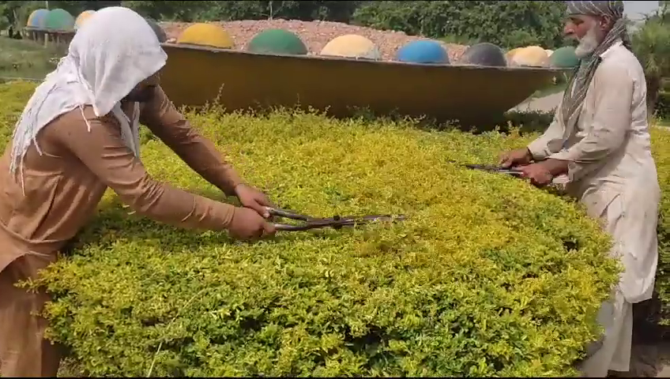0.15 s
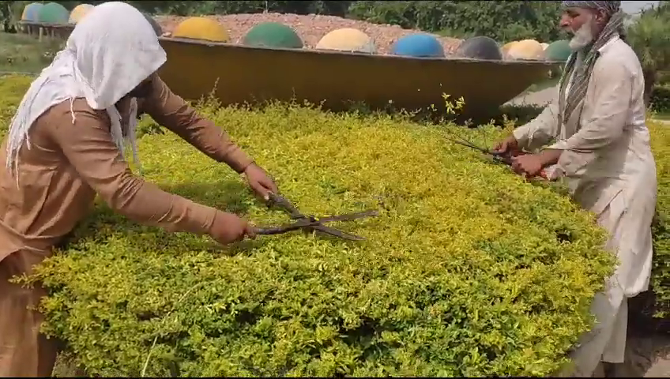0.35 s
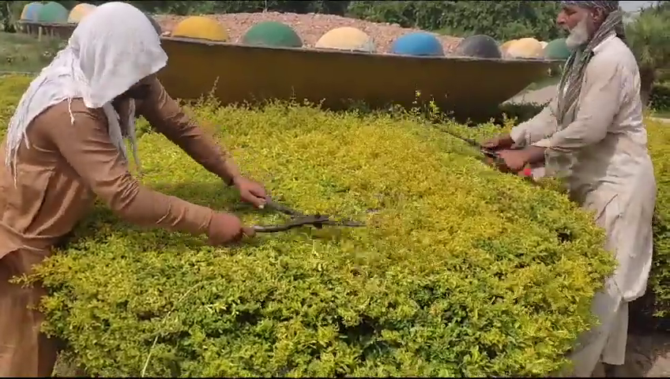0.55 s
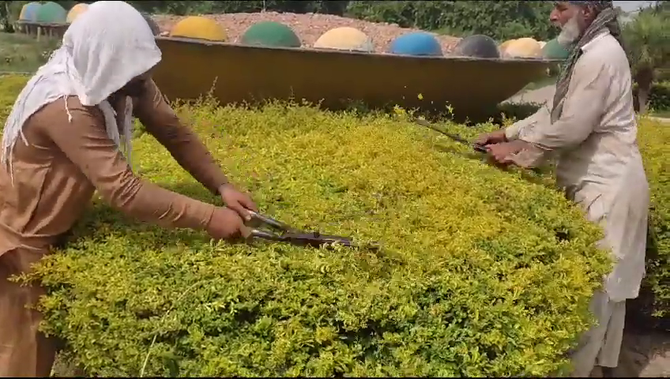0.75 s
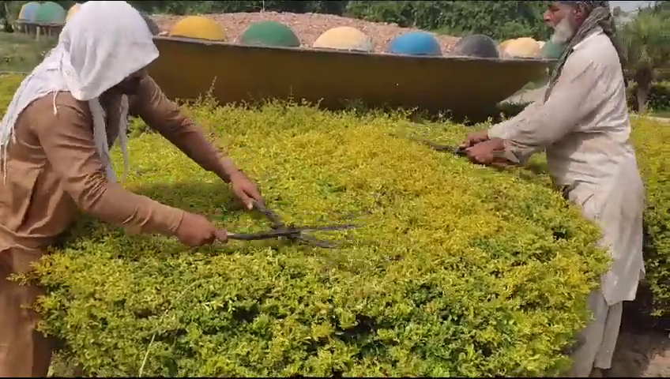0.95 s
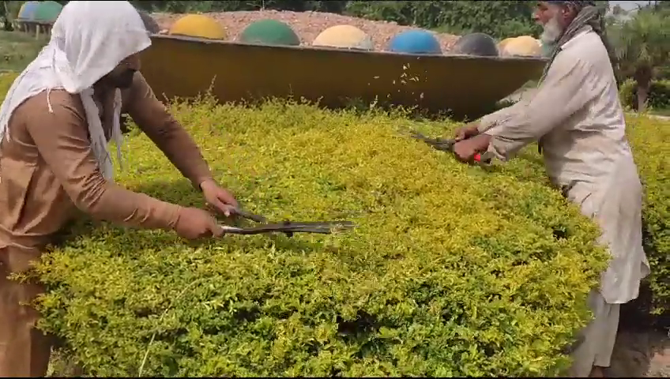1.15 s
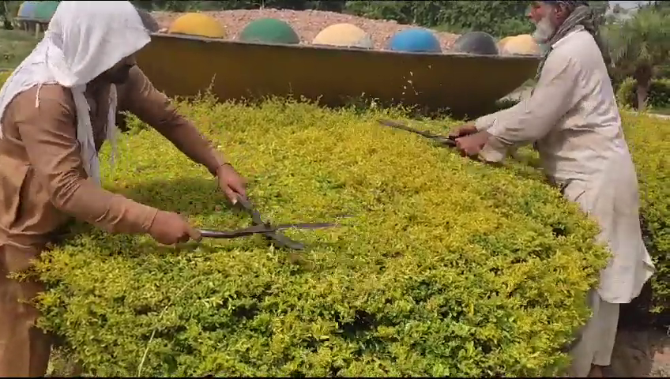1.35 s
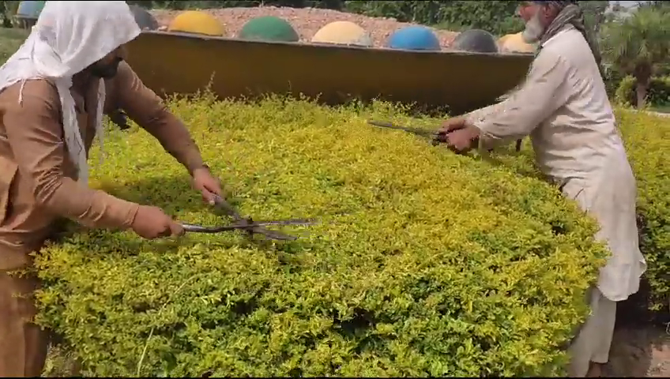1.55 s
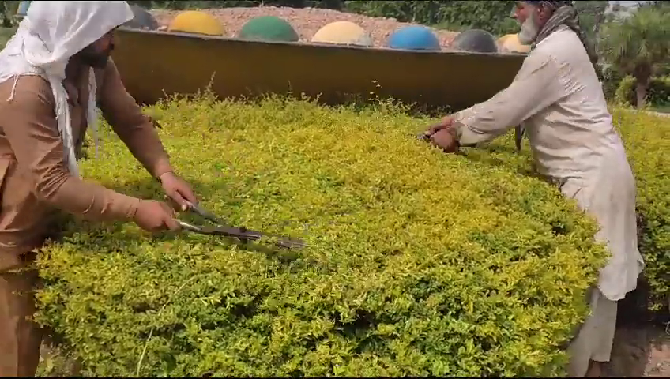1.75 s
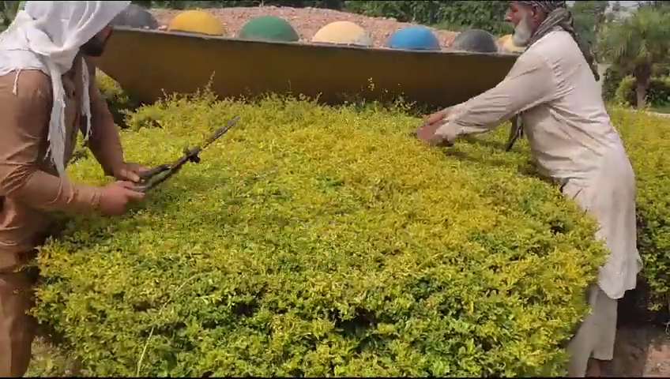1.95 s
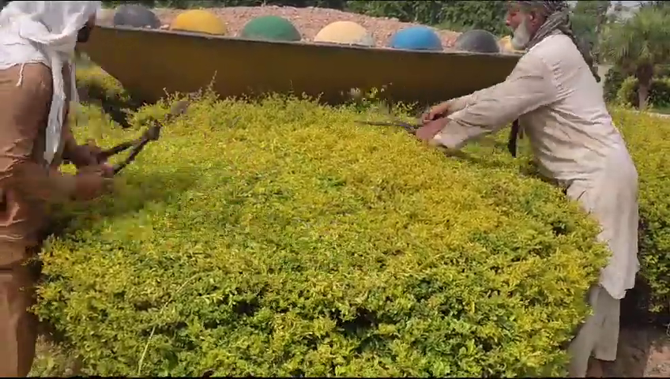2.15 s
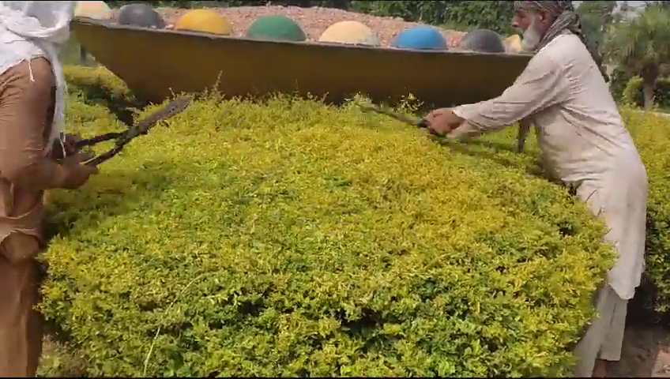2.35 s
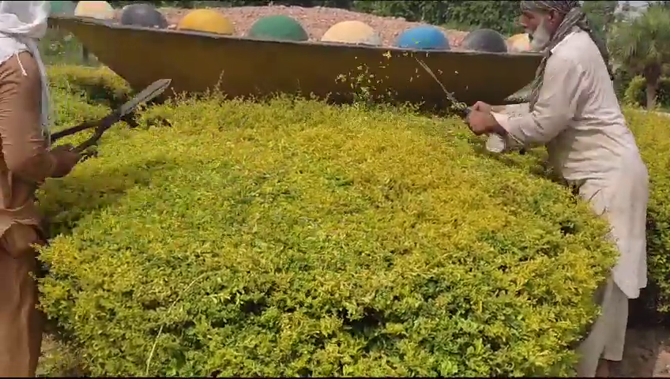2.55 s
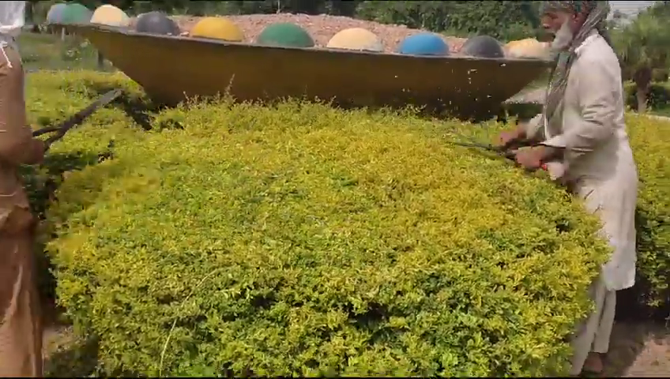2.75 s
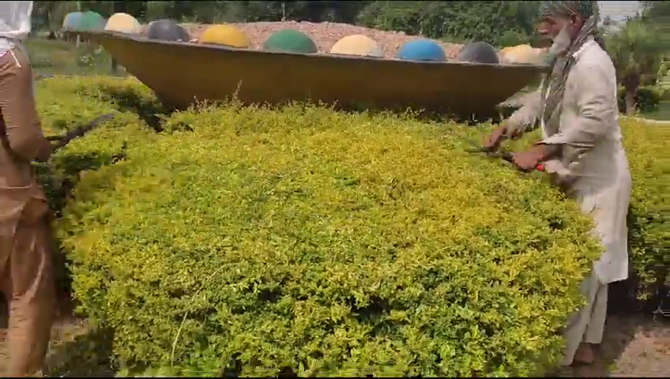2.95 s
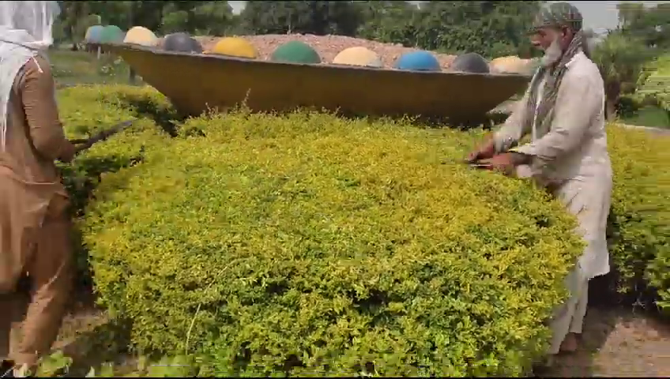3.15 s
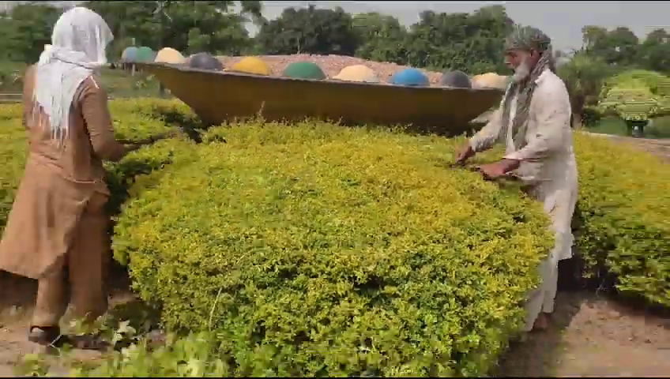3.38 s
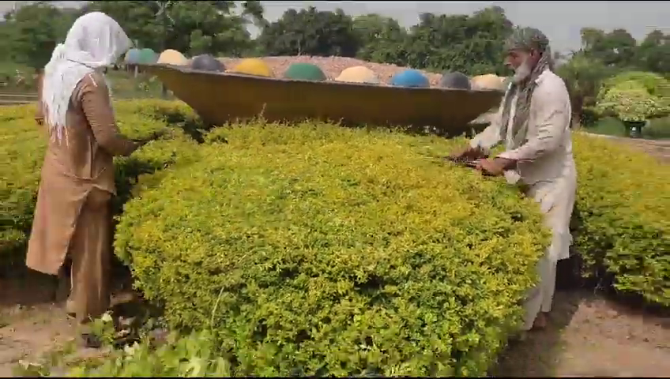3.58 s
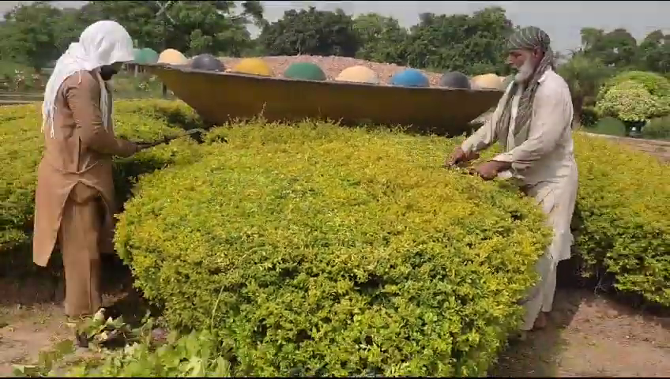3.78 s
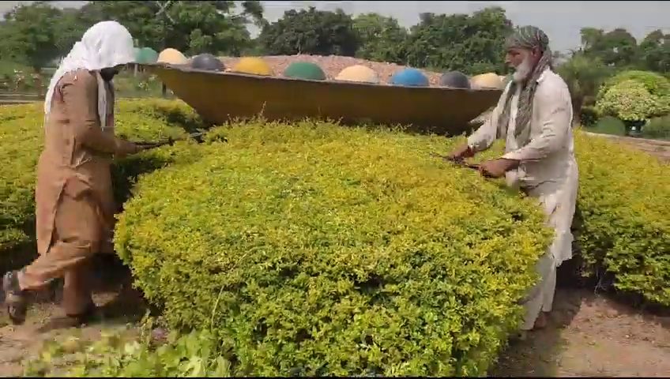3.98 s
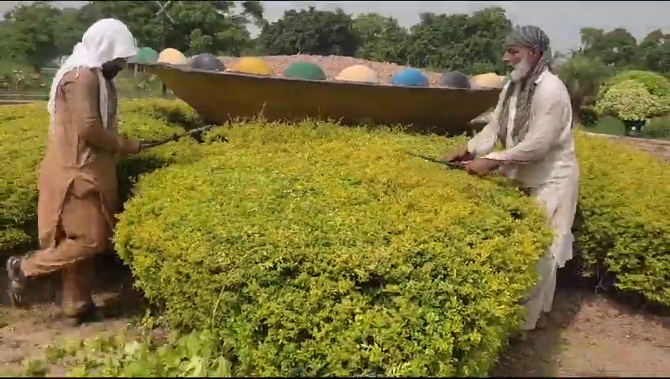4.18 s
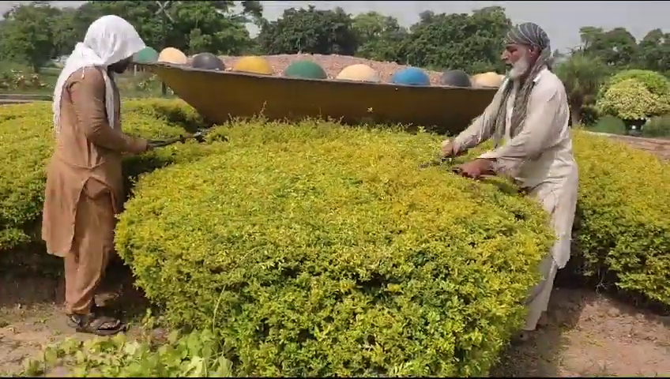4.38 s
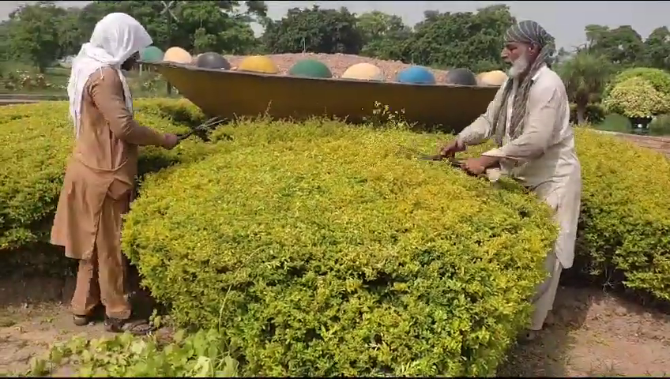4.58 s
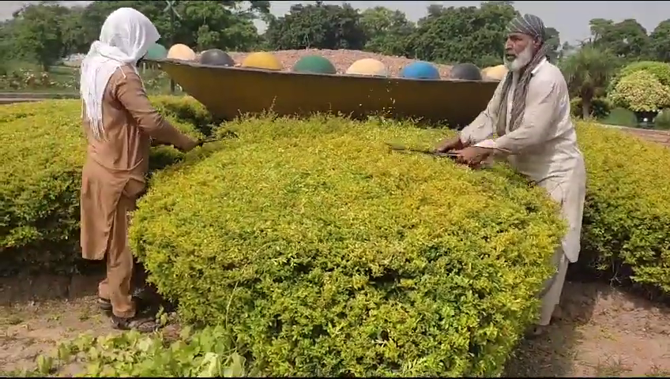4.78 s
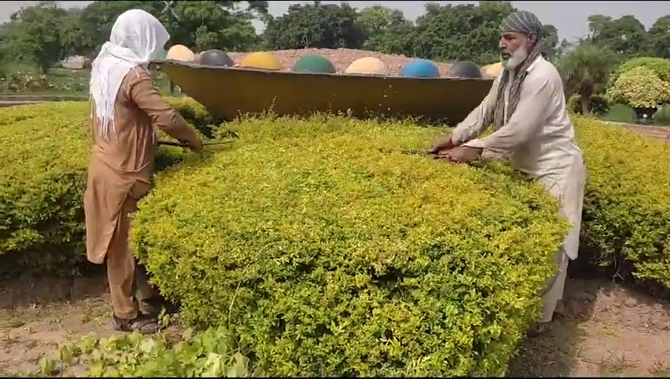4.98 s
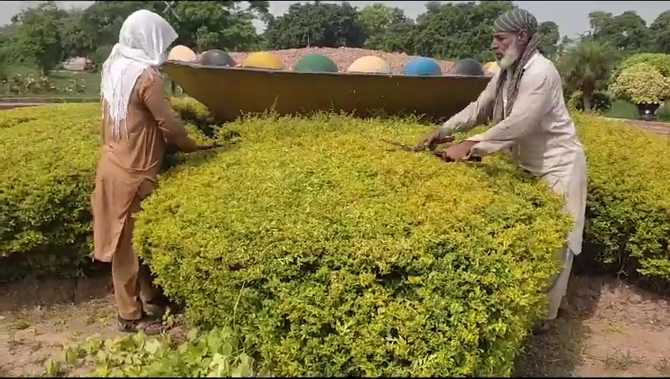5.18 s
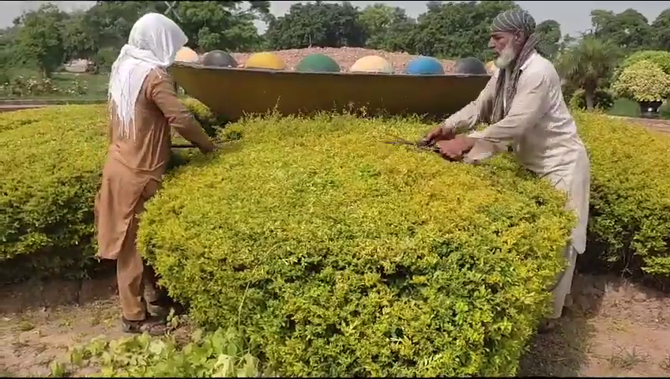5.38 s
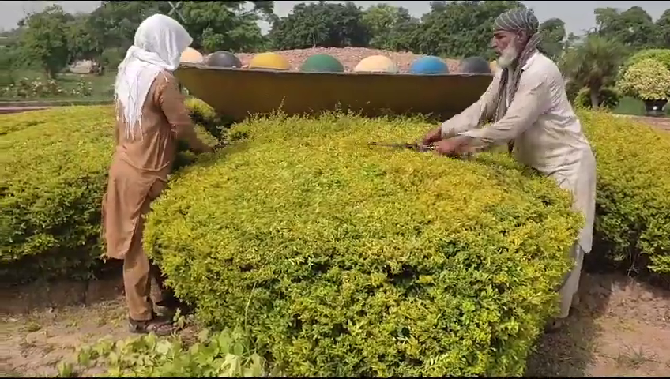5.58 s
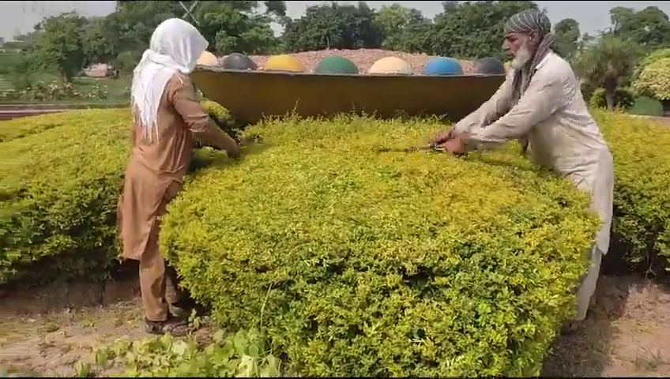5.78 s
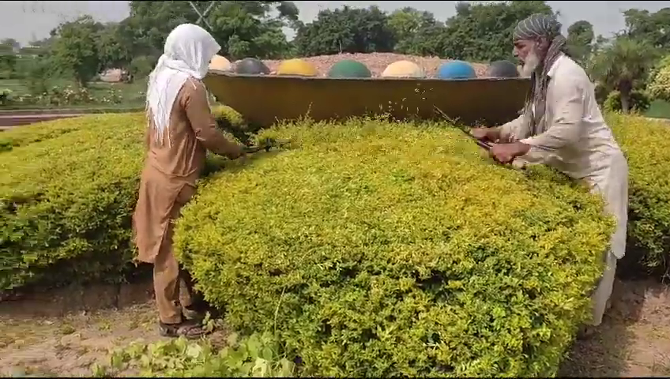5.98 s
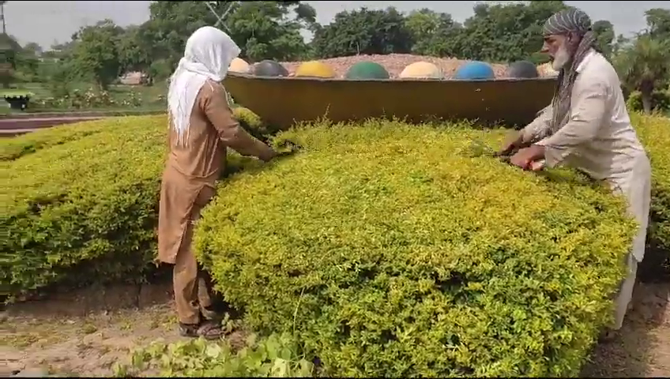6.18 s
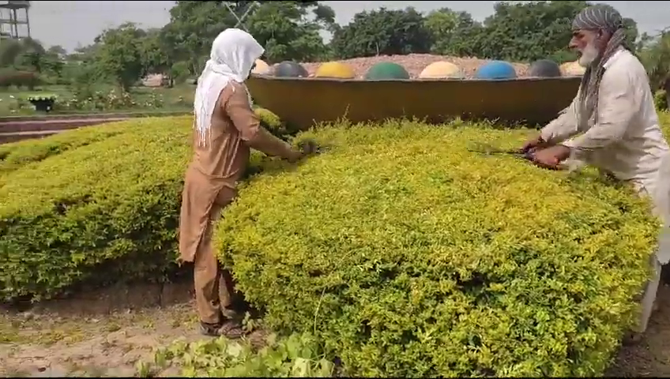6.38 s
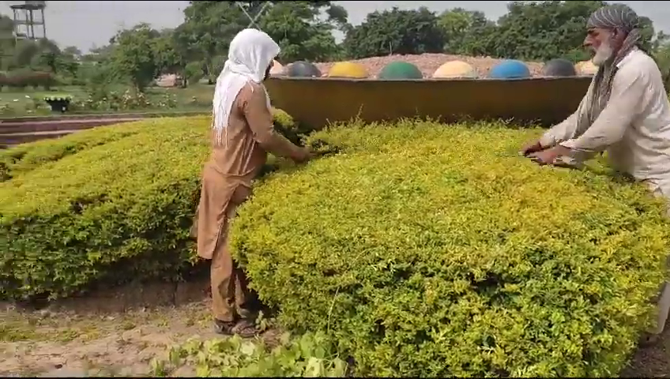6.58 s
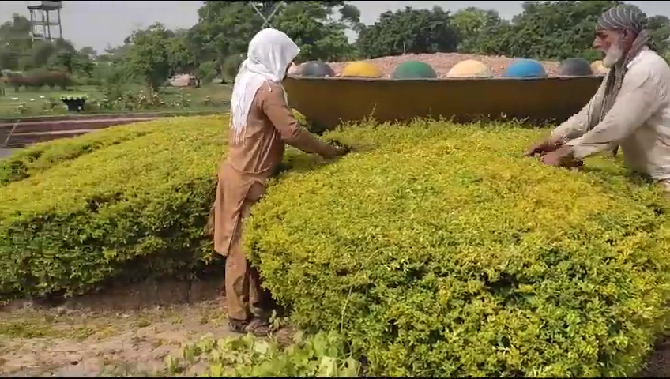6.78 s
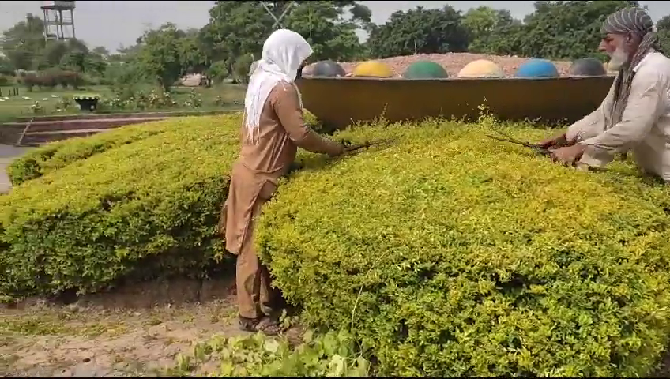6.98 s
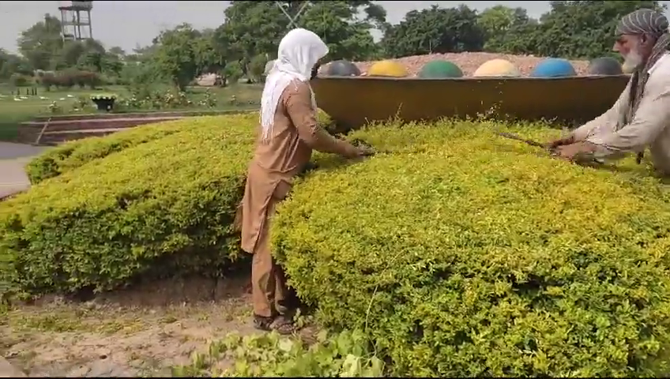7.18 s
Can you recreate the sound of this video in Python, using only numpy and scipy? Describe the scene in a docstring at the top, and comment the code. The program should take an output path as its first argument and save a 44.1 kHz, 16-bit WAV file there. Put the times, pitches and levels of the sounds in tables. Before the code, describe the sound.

Two gardeners trim a hedge outdoors with manual shears. One pair clacks shut sharply about four times a second; the other slices thick growth with softer, swelling crunches, overlapping it at first. The middle thins to mostly one pair, with a brief lull and leaf rustle, then both cut together again. Blades ring briefly, clippings patter, and low traffic and machine hum continue. Close handheld stereo phone pickup, bright and dry.

```python
"""Outdoors at a hedge: two pairs of hand shears crunch through twigs, ring briefly and knock shut.
Parting fibres are short pitched snaps; jolt noise drives handle and blade resonances; cut leaves patter after.
Underneath: traffic as shaped stereo noise and a far machine's hum as noise through two resonances.
A phone with two unlike microphone ports listens; its limiter ducks everything under the loudest cuts."""
import sys
import numpy as np
from scipy import signal
from scipy.fft import rfft, irfft, next_fast_len
from scipy.io import wavfile
from scipy.ndimage import uniform_filter1d, minimum_filter1d, map_coordinates

SR = 44100
rng = np.random.default_rng(int(sys.argv[2]) if len(sys.argv) > 2 else 0)


def store_pcm(level_fs):
    """Save levels as 16-bit WAV."""
    pcm = np.round(np.clip(level_fs, -1, 1) * 32767).astype(np.int16)
    wavfile.write(sys.argv[1], SR, np.atleast_2d(pcm).T)


N = 318843

# traffic spectrum, relative: f/Hz, level/dB per Hz
TRAFFIC_SPECTRUM = [(20, -62), (72, -11), (126, -2), (280, -13), (376, -21), (1180, -26.5), (1710, -22.5),
                    (4210, -38.5), (4940, -47), (11000, -57), (12000, -45), (14200, -58), (14320, -95)]
# traffic left-right correlation: f/Hz, likeness/1
TRAFFIC_LIKENESS = [(60, 1), (290, 0.91), (640, -0.091), (1400, -0.34), (3000, 0.036)]
# far machine resonances: f/Hz, width/Hz, relative level/dB
HUM_MODES = [(129.6, 7, -1), (428, 29, -21.5)]
# slow drifts: t/s, traffic level/dB, shears left minus right/dB, blade ring trim/dB
DRIFTS = [(0, -32.5, 2, 2.5), (4, -31.5, 2, -1), (7.23, -30.5, -1, 3.5)]
# foliage brushed by hands and legs: t/s, level/dB
RUSTLE_LEVEL = [(0, -59), (2.2, -58.5), (2.9, -60.5), (3.3, -46.5), (3.55, -57.5), (3.8, -44), (3.95, -67),
                (4.6, -60), (5.3, -56), (7.23, -51)]
# twig snap spectrum, relative: f/Hz, level/dB per Hz
TWIG_SPECTRUM = [(500, -60), (3000, -17), (4000, 1.5), (5200, -1.5), (6800, -0.5), (8500, -8.5),
                 (11000, -13.5), (14300, 0.5)]
# woody stem snap spectrum, relative: f/Hz, level/dB per Hz
STEM_SPECTRUM = [(600, -74), (1900, -1), (2500, -1), (3200, 5.5), (4300, -28)]
# leaf hiss spectrum, relative: f/Hz, level/dB per Hz
LEAF_SPECTRUM = [(9000, -45), (11300, -5), (11800, 10), (14300, -13)]
# handle resonances: f/Hz, width/Hz, relative level/dB
HANDLE_MODES = [(1108, 155, -0.5), (1592, 91, -4), (1843, 81, -1)]
# blade resonances: f/Hz, width/Hz, relative level/dB
BLADE_MODES = [(3480, 130, 0), (4580, 130, -7)]
# light ticks of twigs and blades between cuts: t/s, twig crunch/dB, hold/s
TICK_EVENTS = [(0.488, -35, .004), (0.621, -39.5, 0.015), (0.879, -46, .003), (1.044, -37, .011),
               (1.588, -36.5, 0.017), (1.8538, -29, 0.0071), (1.94, -41, .004), (2.0838, -45, .003),
               (2.2035, -42, .003), (2.363, -39, 0.016), (2.45, -39.5, 0.0032), (2.9934, -34.5, 0.0038),
               (3.202, -55, .002), (3.403, -42.5, .003), (3.5824, -47.5, .003), (3.837, -41.5, 0.016),
               (4.012, -44, .003), (4.216, -36, 0.0022), (4.327, -38.5, 0.0022), (4.389, -35, .003),
               (4.489, -27.5, 0.001), (4.6196, -39, .002), (4.789, -42.5, .003), (4.901, -41.5, .003),
               (4.9338, -42, .003), (5.0833, -31.5, 0.014), (5.18, -41.5, .004), (5.608, -29, 0.0034),
               (5.701, -37, 0.0031), (5.964, -41.5, .003), (6.456, -44, 0.012), (6.77, -42, .004)]
# blades scraping open: t/s, twig crunch/dB, drag/s, leaf drive/dB re crunch
SCRAPE_EVENTS = [(0.11, -30, 0.0043, -5), (0.1363, -28.5, 0.011, -20), (0.435, -27.5, .0053, -15),
                 (0.462, -30, 0.012, -8), (0.761, -24.5, 0.0025, -23), (0.787, -27.5, .0098, -15),
                 (1.1062, -23.5, 0.0012, 5), (1.121, -31, 0.014, -28), (1.424, -23.5, 0.00062, 5.5),
                 (1.44, -30, 0.019, -23), (1.73, -27, 0.0026, 1), (2.1257, -38, .0023, -20),
                 (5.3625, -23, 0.0038, -4), (5.858, -30, 0.034, -19), (6.224, -26.5, 0.014, -12),
                 (6.5534, -21.5, 0.0079, -14), (6.6572, -30, 0.023, -15), (6.888, -29, .005, -17),
                 (6.926, -29.5, 0.015, -27), (7.048, -35.5, 0.0061, -21), (7.22, -32, .008, -14)]
# one pair clacking shut through thin tips:
# t/s, twig crunch/dB, bite/s, handle drive/dB re crunch, stem drive/dB re crunch
CLACK_EVENTS = [(0.4082, -12.5, 0.0067, -10, -25), (0.679, -26, 0.0032, -1.5, 0),
                (0.9411, -15.5, 0.0068, -5.5, -18), (1.2219, -19.5, 0.017, -4.5, -17),
                (1.4864, -12.5, 0.0083, -7, -11), (1.7493, -14, .0011, -4, -7),
                (2.0163, -16, 0.0035, -5.5, -12), (2.273, -20.5, 0.0013, -1.5, -11),
                (2.5098, -39, 0.026, 5.5, -1), (3.2885, -44.5, 0.018, 8, -10),
                (3.673, -12.5, 0.0096, -2.5, -32), (4.085, -13, 0.012, -6, -15.5),
                (4.405, -16, 0.016, -9.5, -26), (4.6972, -23, 0.0031, 2, -5), (4.969, -11, 0.0077, -8, -17),
                (5.226, -38, 0.0068, -3, -10), (5.248, -10, .012, -11, -11.5),
                (5.517, -9.5, 0.0037, -10.5, -5.5), (5.774, -17.5, 0.0094, -7, -4.5),
                (6.035, -13.5, 0.0011, -3.5, -5), (6.534, -26.5, .002, 3.5, 0),
                (6.8546, -17, 0.0088, 0, -16), (7.116, -37, 0.028, -1, 1)]
# other pair slicing thick growth: t/s, twig crunch/dB, bite/s, t60/s, blade drive/dB re crunch
SLICE_EVENTS = [(0.022, -12, 0.02, 0.037, -17), (0.348, -14.5, .019, 0.023, -5.5),
                (0.678, -15.5, 0.015, 0.064, .5), (0.9878, -14, 0.019, 0.018, 0),
                (1.315, -14, .02, 0.016, -0.5), (1.645, -13, 0.0195, 0.017, -16),
                (1.9763, -12, 0.02, 0.018, 0), (5.446, -13, .019, 0.033, -3),
                (5.7985, -15.5, .012, 0.065, -7), (6.149, -17.5, .017, 0.06, 5.5),
                (6.478, -16, 0.016, 0.096, -1), (6.819, -12.5, 0.011, .094, 3.5),
                (7.159, -10, 0.016, 0.031, 1.5)]
# microphone ports: f/Hz, left minus right/dB
PORT_DIFFERENCE = [(600, -0.5), (2000, 1), (3500, -2.5), (6500, -7.5), (8500, -1), (11000, 3.5), (13000, 8)]

PORT_TOP_HZ, TOP_HZ = 14300, 15500
SNAPS_PER_S = 8000
# drives re crunch
SLICE_KNOCK_DB, SLICE_STEMS_DB, SLICE_LEAVES_DB = -22, -3, -8
CLACK_RING_DB, CLACK_LEAVES_DB = 3.5, -16.5
CLACK_RING_DB_PER_STEM_DB = 0.73  # ring grows with the stems' share
SCRAPE_KNOCK_DB, SCRAPE_STEMS_DB, SCRAPE_RING_DB = -14.5, -5.5, -0.5
TICK_KNOCK_DB, TICK_STEMS_DB, TICK_RING_DB, TICK_LEAVES_DB = -5.5, -16.5, -12, -16
# first instant re end of the bite
SLICE_START_DB, CLACK_START_DB, SCRAPE_START_DB, TICK_START_DB = -7, 4, 0, 3
# a long bite uses up the swing: (t60/s after an instant stop, t60 lost/s per s of bite)
CLACK_TAIL, SCRAPE_TAIL = (0.062, 1.6), (0.067, 0.44)
SHORTEST_T60_S, TICK_T60_S = 0.017, 0.03
BITE_DB_PER_S, SOFT_BITE_DB_PER_S = 20000, 9000  # onset slopes: crack, thick growth
COLOUR_DB = 5  # rms of the spectral unevenness


def amp(db):
    """Decibels to gain."""
    return 10 ** (np.asarray(db) / 20)


def unit(x):
    """Scale to rms 1."""
    return x / np.sqrt(np.mean(x ** 2) + 1e-20)


def along(points, hz):
    """Interpolate (Hz, value) points on a log-frequency axis."""
    f, v = np.transpose(points)
    return np.interp(np.log(hz + 1), np.log(f + 1), v)


def curves(rows):
    """One value per sample for each column after the time."""
    s, *cols = np.transpose(rows)
    return [np.interp(np.arange(N) / SR, s, c) for c in cols]


def wobble(knots_per_s):
    """Smooth random curve through random knots."""
    knots = rng.standard_normal(int(N * knots_per_s / SR) + 4)
    return map_coordinates(knots, [np.arange(N) * knots_per_s / SR])


def filtered(x, response):
    """Multiply the spectrum of x by a response of frequency."""
    m = next_fast_len(N + SR // 2)
    return irfft(rfft(x, m) * response(np.fft.rfftfreq(m, 1 / SR)), m)[..., :N]


def modes(table):
    """Causal damped resonances of alternating sign, summed; unit gain for white noise."""
    def shape(f):
        total = 0
        for k, (centre, width, db) in enumerate(table):
            damping = 1j * f * width
            total = total + (-1) ** k * amp(db) * damping / (centre * centre - f * f + damping)
        return total

    return lambda f: shape(f) / np.sqrt(np.mean(np.abs(shape(f)) ** 2))


def rush(spectrum, likeness):
    """Stereo noise of rms 1; the mid-side split sets left-right correlation at each frequency."""
    def response(hz):
        angle = np.arccos(np.clip(along(likeness, hz), -1, 1)) / 2
        return amp(along(spectrum, hz)) * [np.cos(angle), np.sin(angle)]

    mid, side = filtered(rng.standard_normal((2, N)), response)
    return unit(np.array([mid + side, mid - side]))


def background():
    """Traffic wash plus a wavering machine hum: noise through narrow resonances."""
    wash = rush(TRAFFIC_SPECTRUM, TRAFFIC_LIKENESS)
    hum = amp(-6.0) * unit(filtered(rng.standard_normal(N), modes(HUM_MODES)))
    return amp(curves(DRIFTS)[0]) * (wash + hum)


def clippings(cuts):
    """Cut leaves patter through the hedge and foliage scatters each cut: a short crackling noise tail per ear."""
    t = np.arange(SR // 3) / SR
    tail = rng.standard_normal((2, len(t))) * amp(-60 * t / 0.27)  # t60 0.27 s
    scattered = signal.fftconvolve(cuts, tail / np.linalg.norm(tail[0]), axes=1)[:, :N]
    return scattered * unit(amp(2.5 * wobble(120)))


def contacts():
    """Every contact: t/s, crunch/dB, hold/s, t60/s, start/dB; knock, stems, ring, leaves/dB re crunch."""
    def tail_s(rule, hold):
        return max(rule[0] - rule[1] * hold, SHORTEST_T60_S)

    events = []
    for s, db, hold, t60, ring in SLICE_EVENTS:
        events.append((s, db, hold, t60, SLICE_START_DB,
                       SLICE_KNOCK_DB, SLICE_STEMS_DB, ring, SLICE_LEAVES_DB))
    for s, db, hold, knock, stems in CLACK_EVENTS:
        ring = CLACK_RING_DB + CLACK_RING_DB_PER_STEM_DB * stems
        events.append((s, db, hold, tail_s(CLACK_TAIL, hold), CLACK_START_DB,
                       knock, stems, ring, CLACK_LEAVES_DB))
    for s, db, hold, hiss in SCRAPE_EVENTS:
        events.append((s, db, hold, tail_s(SCRAPE_TAIL, hold), SCRAPE_START_DB,
                       SCRAPE_KNOCK_DB, SCRAPE_STEMS_DB, SCRAPE_RING_DB, hiss))
    for s, db, hold in TICK_EVENTS:
        events.append((s, db, hold, TICK_T60_S, TICK_START_DB,
                       TICK_KNOCK_DB, TICK_STEMS_DB, TICK_RING_DB, TICK_LEAVES_DB))
    return events


def strokes():
    """Force over time on twigs, handles, stems, blades, leaves: onset, bite, exponential decay."""
    forces = np.zeros((5, N + SR))
    lead = SR // 50
    t = np.arange(-lead, SR // 4) / SR
    before = np.minimum(t, 0)
    for s, db, hold, t60, start_db, *shares_db in contacts():
        # thick growth builds up, thin growth cracks at once
        bite_db_per_s = SOFT_BITE_DB_PER_S if start_db < -4 else BITE_DB_PER_S
        graze = amp(-18 + before * 1100) * (t < 0)  # edges graze leaves before they bite
        onset = amp(before * bite_db_per_s) + graze
        bite_db = start_db * np.clip(1 - t / hold, 0, 1)
        decay_db = -60 * np.maximum(t - hold, 0) / t60
        force = amp(db + bite_db + decay_db) * onset
        forces[:, round(s * SR):][:, :len(t)] += force * amp([0, *shares_db])[:, None]
    return forces[:, lead:lead + N]


def snaps(forces, spectra):
    """Each parting fibre rings a few cycles at its own pitch, with unlike phase and strength at the ears."""
    when, pitch = rng.random((2, N * SNAPS_PER_S // SR))
    life, size, left, right, lag = rng.standard_normal((5, len(when)))
    at = (when * N).astype(int)
    hz = pitch * PORT_TOP_HZ
    t = np.arange(144) / SR
    power = sum((force[at] * unit(amp(along(points, hz)))) ** 2 for force, points in zip(forces, spectra))
    strength = np.sqrt(power * 8 / SNAPS_PER_S) * unit(amp(0.81 * size))
    tau_s = np.minimum(0.00035 * np.exp(0.4 * life[:, None]), 0.00055)
    swell = t / tau_s * np.exp(-t / tau_s) / np.sqrt(tau_s)
    where = (at[:, None] + np.arange(len(t))).ravel()
    ears = []
    for side, phase in ((left, 0 * lag), (right, lag * hz / 1500)):
        ring = swell * np.sin(2 * np.pi * hz[:, None] * t + phase[:, None])
        rows = ring * (strength * amp(1.76 * side))[:, None]
        ears.append(np.bincount(where, rows.ravel(), N)[:N])
    return np.array(ears)


def coloured(x):
    """Crunch timbre is uneven: random spectral peaks and dips that shift over time."""
    z = signal.stft(x, nperseg=512, noverlap=384)[2]
    field = rng.standard_normal(z.shape[1:])
    field = uniform_filter1d(field, size=3, axis=0)  # about 260 Hz
    field = uniform_filter1d(field, size=8, axis=1)  # about 23 ms
    gain = unit(amp(COLOUR_DB * unit(field)))
    return signal.istft(z * gain, nperseg=512, noverlap=384)[1][:, :N]


def shears():
    """Fibres part in millisecond lumps; jolt noise in the same lumps, drawn per part, rings handles and blades."""
    _, pan_db, ring_trim_db = curves(DRIFTS)
    twigs, knock, stems, scrape, leaves = strokes() * unit(amp(2.2 * wobble(400)))
    rustle = amp(curves(RUSTLE_LEVEL)[0] + 2.4 * wobble(90))
    fibre_forces = [twigs + rustle, stems, leaves + 0.23 * rustle]
    crunch = coloured(snaps(fibre_forces, [TWIG_SPECTRUM, STEM_SPECTRUM, LEAF_SPECTRUM]))
    jolts = rng.standard_normal((2, 3, N))  # handles, blades: one common to the ears, one for each ear
    handle_jolts = knock * (jolts[0, 0] + 0.3 * jolts[0, 1:])
    handles = amp(-1.5) * filtered(handle_jolts, modes(HANDLE_MODES))
    blade_jolts = scrape * (0.34 * jolts[1, 0] + jolts[1, 1:])
    blades = amp(ring_trim_db - 5.0) * filtered(blade_jolts, modes(BLADE_MODES))
    return (crunch + handles + blades) * amp([pan_db / 2, -pan_db / 2])


def scene():
    """Background, clippings and shears."""
    cuts = shears()
    return background() + amp(-14.5) * clippings(cuts) + cuts


def record(dry):
    """Two unlike ports, both falling off in the top; then a peak limiter and a band limit."""
    def ports(hz):
        tilt_db = along(PORT_DIFFERENCE, hz) / 2
        top_db = np.interp(hz, [PORT_TOP_HZ - 150, PORT_TOP_HZ + 150, TOP_HZ], [0, -28, -38])
        return amp([tilt_db, -tilt_db]) * amp(top_db)

    x = filtered(dry, ports)
    need = np.minimum(1, 0.97 / (np.abs(x).max(axis=0) + 1e-9))
    held = minimum_filter1d(need, size=800, origin=250)
    gain = uniform_filter1d(held, size=300)  # shared by both ports
    return filtered(x * gain, lambda hz: hz < TOP_HZ)


dry = scene()
out = record(dry)
store_pcm(out)
```